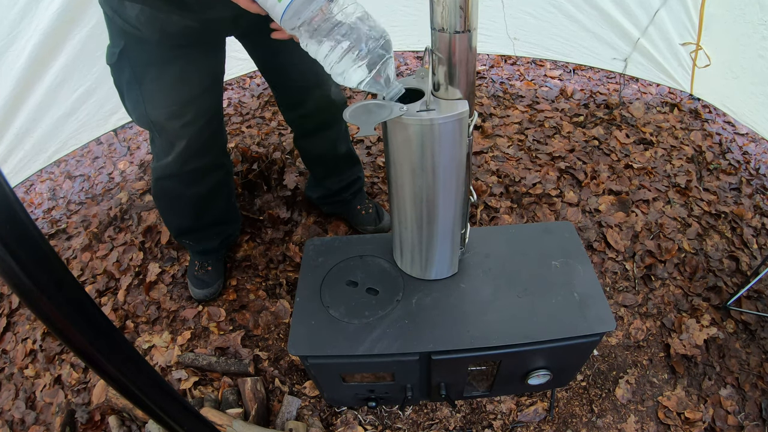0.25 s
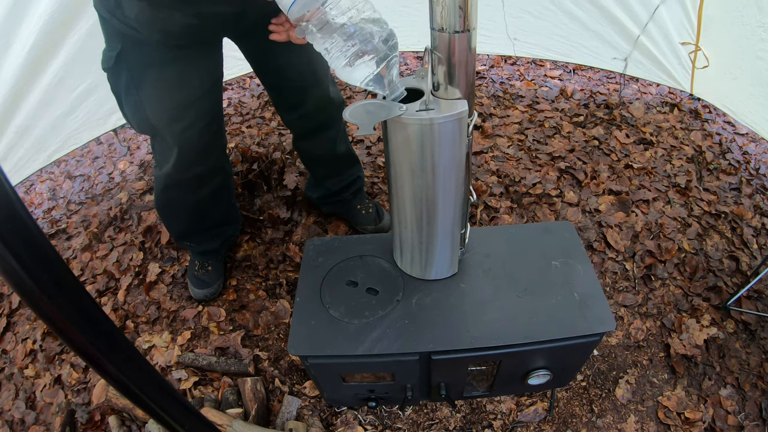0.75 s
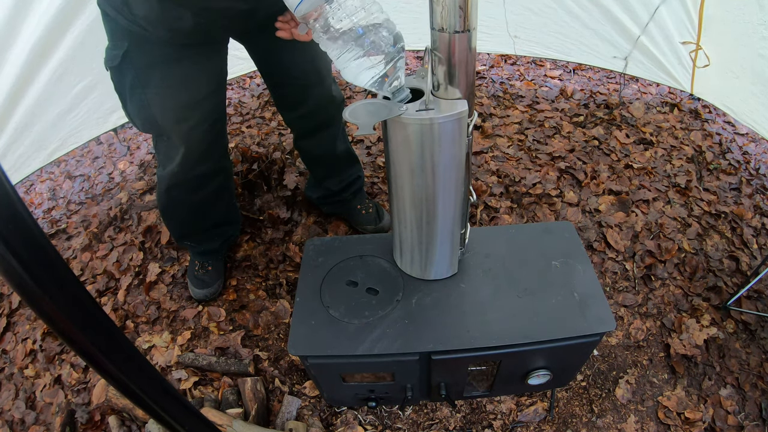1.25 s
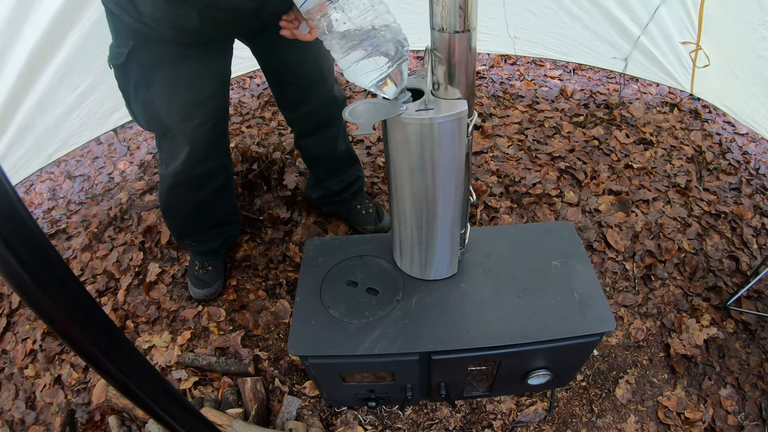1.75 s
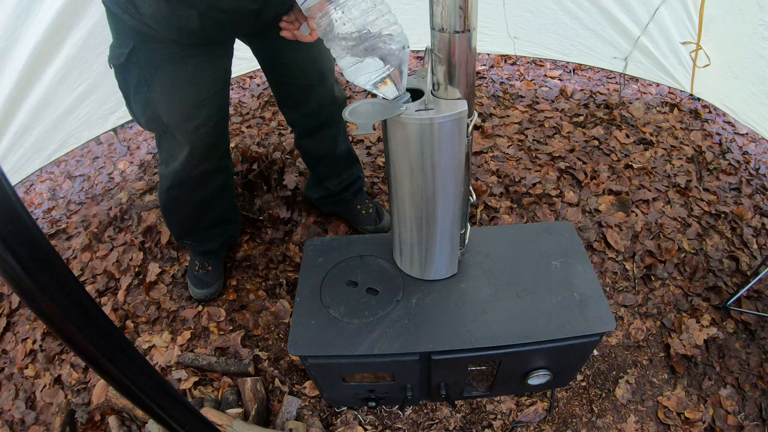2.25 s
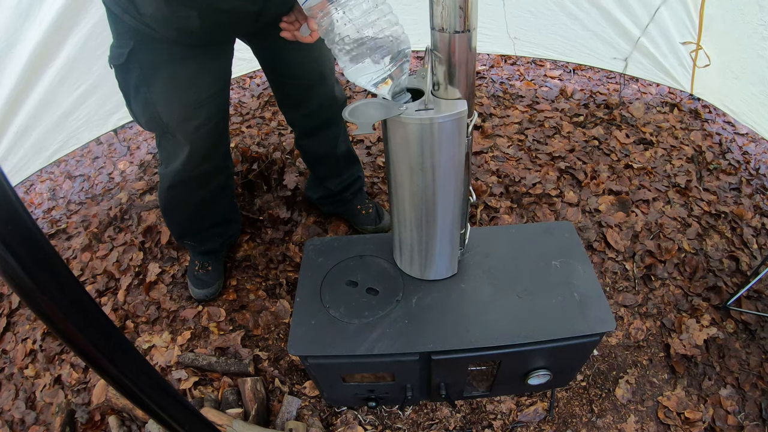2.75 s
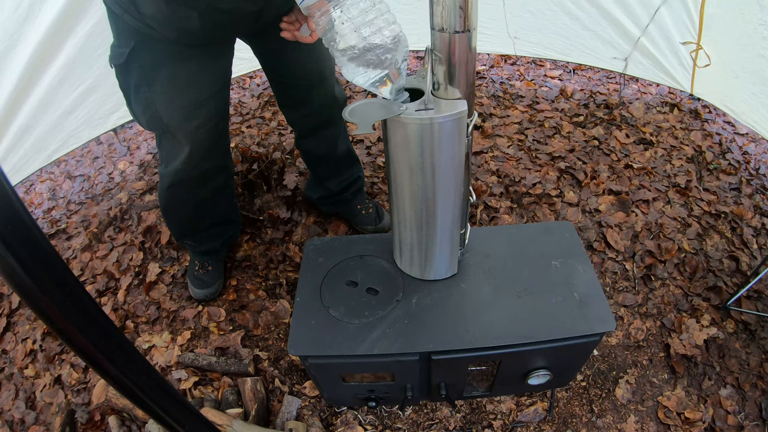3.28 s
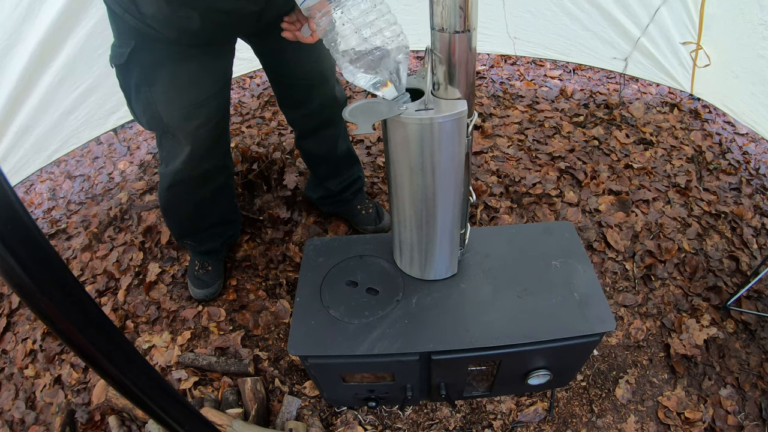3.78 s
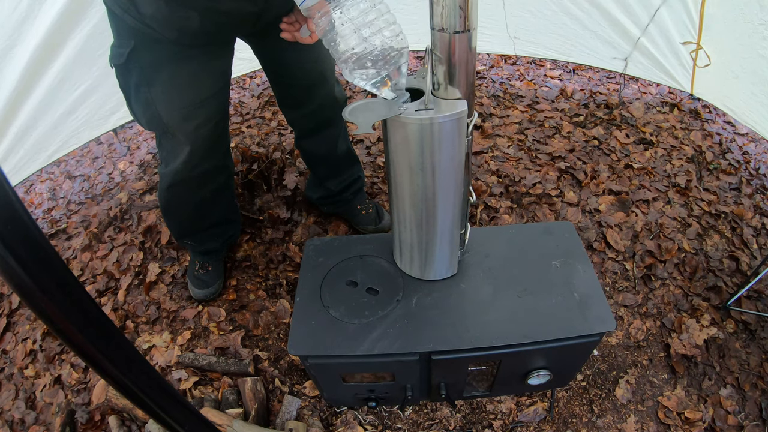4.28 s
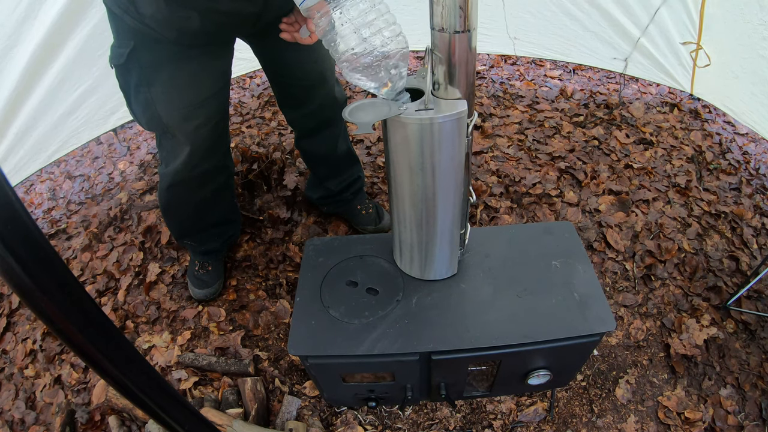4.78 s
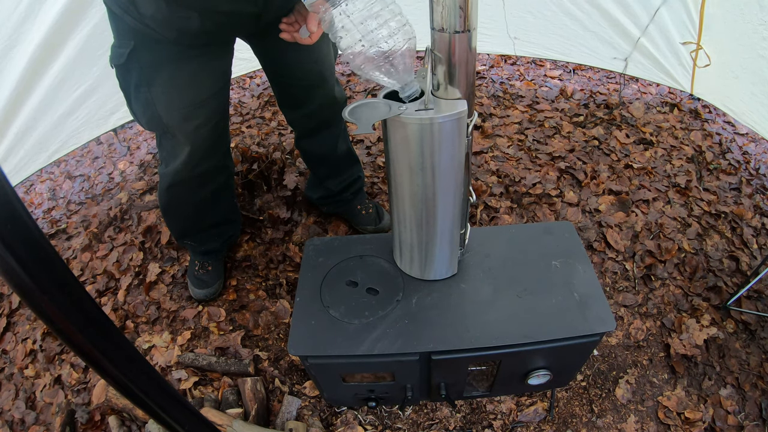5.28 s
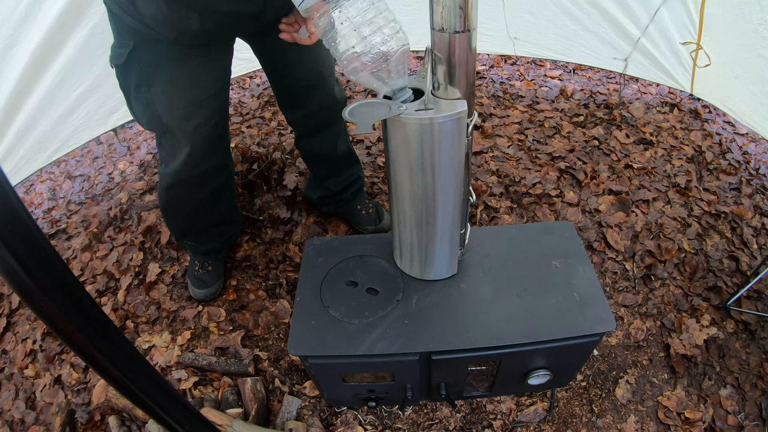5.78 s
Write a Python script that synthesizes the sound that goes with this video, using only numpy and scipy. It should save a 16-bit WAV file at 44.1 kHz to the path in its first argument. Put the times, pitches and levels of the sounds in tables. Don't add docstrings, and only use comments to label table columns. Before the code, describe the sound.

Already under way at the start, a close, wet pour glugs unevenly into a sheet-metal tank. Hollow, low-pitched gulps overlap with bright slaps of water, metallic colour from the tank wall, and clusters of clear bubbles. Soft low thumps come from the flexing bottle. After nearly six seconds the stream quickly dies to a few drips. The tent adds only a very short, soft reflection, near-centred in stereo.

```python
import sys
import numpy as np
from scipy import signal
from scipy.fft import rfft, irfft, next_fast_len
from scipy.io import wavfile
from scipy.ndimage import uniform_filter1d

SR = 44100
rng = np.random.default_rng(int(sys.argv[2]) if len(sys.argv) > 2 else 0)


def volts(x):
    e = np.asarray(x, float) / 20
    return 10 ** e


def inscribe(sig):
    pcm = np.round(np.clip(np.atleast_2d(sig).T, -1, 1) * 32767)
    wavfile.write(sys.argv[1], SR, pcm.astype(np.int16))


N = 266011
T = np.arange(N) / SR

# start in seconds, peak in dB, pitch in Hz, t60 in seconds.
GULPS = [(0.043, -29.5, 267, 0.18), (0.18, -22.5, 299, 0.064), (.362, -25, 318, 0.094),
         (0.526, -22, 287, 0.052), (0.822, -19.5, 295, 0.18), (0.976, -19.5, 292, 0.12),
         (1.169, -12.5, 288.6, .14), (1.299, -28, 279, 0.21), (1.475, -24, 278, 0.078),
         (1.678, -25, 326, 0.051), (1.713, -30.5, 308, 0.08), (1.835, -18.5, 277, 0.068),
         (2.01, -26.5, 282, 0.069), (2.342, -16.5, 304, 0.12), (2.538, -21.5, 290, 0.062),
         (2.883, -31.5, 294, 0.3), (3.348, -18, 313, 0.057), (3.677, -28.5, 306, 0.044),
         (3.79, -24.5, 327, 0.15), (3.964, -23.5, 326.6, 0.2), (3.991, -30.5, 294, 0.17),
         (4.154, -18.5, 306, 0.052), (4.373, -23.5, 332, 0.14), (4.654, -24.5, 301, 0.061),
         (4.826, -23.5, 304, 0.06), (5.005, -22.5, 326, 0.31), (5.106, -33.5, 308, 0.19),
         (5.23, -19.5, 333, 0.07), (5.402, -25, 332, 0.049), (5.548, -21, 340, 0.071)]
# start in seconds, peak in dB, pitch in Hz, low push in dB relative to the glug.
GLUGS = [(0.097, -33, 245, -16), (0.232, -32, 285, -24), (0.426, -29, 248, -21), (0.58, -27.5, 245, -22),
         (0.749, -32.5, 249, -17), (0.918, -33.5, 253, -18), (1.027, -25.5, 258, -40),
         (1.248, -38, 252, -10), (1.429, -31.5, 250, -16.5), (1.519, -31.5, 259, -19),
         (1.776, -28.5, 263, -19), (1.963, -28.5, 256, -51), (2.299, -21.5, 288, -19.5),
         (2.4, -34, 279, -20), (2.651, -26, 236.5, -12), (2.835, -35, 309, -25), (2.938, -25, 290, -15),
         (3.106, -29.5, 267.4, -14), (3.453, -26.5, 304, -11), (3.546, -30, 351, -14),
         (3.755, -28, 289, -13), (3.87, -32.5, 266, -38), (4.128, -32, 294, -13), (4.205, -31, 253, -47),
         (4.436, -26.5, 318, -12), (4.533, -41, 251, -40), (5.631, -43, 254, -32)]
# start in seconds, peak in dB, pitch in Hz, t60 in seconds.
LINKS = [(0.256, -28.5, 240, 0.11), (0.342, -41, 343, 0.037), (.55, -29, 280, 0.046),
         (0.698, -38, 296, 0.12), (1.076, -32.5, 260, 0.062), (1.274, -34.5, 298.5, 0.086),
         (1.566, -34, 240, 0.087), (1.608, -35.5, 283, 0.05), (1.943, -31, 282, 0.16),
         (1.991, -28, 264, 0.064), (2.05, -35, 288, 0.077), (2.083, -33.5, 294, 0.17),
         (2.636, -28.5, 315, 0.049), (2.689, -32.5, 294, 0.055), (2.736, -32.5, 223, 0.032),
         (3.155, -35, 333, 0.036), (3.199, -40, 298, 0.23), (3.26, -39, 301, 0.13),
         (3.883, -32.5, 301, .08), (4.04, -35, 298, 0.11), (4.276, -34, 298, 0.15),
         (4.415, -31, 352, 0.087), (4.468, -31, 267, 0.072), (4.815, -31.5, 335, 0.18)]
# time in seconds, pitch in Hz.
AIR_COLUMN = [
    (0, 292.4),
    (3, 311),
    (6, 320),
]
BOTTLE_HZ = 241.9

# start in seconds, peak in dB, brightness above 5 kHz in relative dB, t60 in seconds.
SLUGS = [(0.191, -27.5, -15, 0.32), (0.31, -38, -5.5, 0.32), (0.466, -32, -39, 0.038),
         (0.812, -20, -11, 0.13), (1.162, -30.5, -12.5, 0.87), (1.296, -40, -9, 0.13),
         (1.362, -30.5, -10, 0.12), (1.827, -23.5, -11.5, 0.13), (2.022, -36, -35, 0.12),
         (2.291, -29, -12.5, 0.39), (2.53, -28.5, -14.5, 0.32), (2.622, -27.5, -16, 0.21),
         (3.197, -29.5, -15, 0.11), (3.674, -33.5, -7, 0.045), (3.771, -26, -14, 0.22),
         (4.148, -25, -6, 0.15), (4.355, -26.5, -16.5, 0.13), (4.648, -41.5, 4.5, 0.16),
         (4.811, -34, -4, 0.34), (5.027, -25.5, -13, 0.13), (5.105, -29, -11, 0.033),
         (5.221, -27, -9.5, 0.32), (5.386, -32.5, -10, 0.24), (5.536, -28, -10, 0.2)]
# start in seconds, peak in dB, brightness above 5 kHz in relative dB.
DRIPS = [(0.005, -31.5, -9), (0.389, -31, -31), (0.52, -24.5, -47), (0.678, -28.5, -23), (0.745, -31, -17),
         (0.9, -47, 1), (1.019, -22.5, -24), (1.063, -30.5, -10), (1.446, -48.5, 8.5), (1.517, -27, -9.5),
         (1.905, -55, -21), (1.937, -24.5, -24), (2.035, -27.5, -25), (2.341, -18, -4.5),
         (2.653, -22.5, -11), (2.703, -30.5, -16), (2.731, -31.5, -14), (2.791, -26.5, 0),
         (3.15, -41, -1.5), (3.301, -57, 11.5), (3.345, -24, -12), (3.46, -36.5, -3.5), (3.49, -30, -9),
         (3.629, -33.5, -19), (3.977, -41.5, -4), (4.054, -36, -8), (4.276, -43.5, 10), (4.998, -27.5, -16),
         (5.455, -25, -19), (5.626, -27.5, -15), (5.721, -53, -31), (5.74, -29, -8), (5.806, -54, 10.5),
         (5.825, -50, -7), (5.857, -59, 11)]
# start in seconds, peak in dB, brightness above 5 kHz in relative dB.
SURGES = [(2.876, -20.5, -9), (3.028, -36.5, -5), (3.246, -45, 1.5), (2.195, -29, -18), (2.458, -46, 5),
          (2.482, -40.5, 3.5), (0.595, -40, -3), (1.642, -30.5, -18), (1.709, -36, -10), (1.978, -38, -4),
          (2.111, -55, 14), (2.225, -25, -7), (3.702, -35, -7.5), (3.868, -44.5, 1), (4.426, -27, -16),
          (4.466, -26.5, -18), (4.53, -26, -16.5), (4.583, -39, -2), (4.721, -42.5, -5), (4.782, -38, -4.5),
          (4.959, -28, -17), (5.057, -40, -5), (5.641, -31, -16)]
# frequency in Hz, level in dB per Hz.
WATER = [(250, -62), (420, -22), (769, -10.5), (965, -6), (1110, -8), (1690, -5.5), (1850, -6), (2250, 0),
         (3490, 8), (5160, -1), (7650, 1.5), (15600, -31.5)]
# frequency in Hz, width in Hz, level in dB when low, level in dB when full.
WALL = [(481, 35, 2.5, 13.5), (974, 33, 8.5, 4), (1210, 220, -24, 3.5), (1450, 39, 10, -0.5),
        (1850, 59, 10.5, -1), (2134, 27, 0, 2.5), (2394, 62, 8, -42), (2820, 140, -1.5, 3.5),
        (3020, 37, -1, -12), (3340, 59, 3, 4)]

# start in seconds, peak in dB, pitch in Hz.
BUBBLES = [(0.082, -41, 765), (0.173, -41, 810), (0.199, -37, 465), (0.341, -44, 677), (0.502, -31, 844),
           (0.853, -29.5, 850), (0.971, -36, 450), (1.163, -35, 760), (1.298, -32, 650), (1.426, -43, 740),
           (1.471, -36, 717), (1.655, -33, 553), (1.829, -46, 806), (2.007, -34, 480), (2.343, -26, 436),
           (2.631, -40, 850), (2.731, -25.5, 487), (2.833, -32, 484), (2.881, -38, 510),
           (2.991, -33.5, 616), (3.176, -36, 510), (3.454, -31, 510), (3.543, -32, 483), (3.565, -36, 767),
           (3.753, -30.5, 460), (4.149, -39, 505), (4.434, -30.5, 427), (4.477, -32.5, 606),
           (4.536, -27, 502), (4.646, -37, 470), (4.823, -42, 510), (5.0, -37, 685), (5.022, -29.5, 660),
           (5.393, -32, 627), (5.545, -32.5, 545), (5.628, -30, 480),
           (0.083, -37, 1380), (0.134, -30, 1510), (0.179, -29.5, 1334), (0.183, -28.5, 910),
          (0.218, -29.5, 894), (0.346, -24, 1586), (0.486, -28.5, 1610), (0.639, -31, 960),
          (0.818, -24, 1400), (0.972, -31.5, 956), (1.019, -28.5, 950), (1.165, -37, 970),
          (1.211, -29.5, 1590), (1.297, -34, 1555), (1.318, -26, 977), (1.429, -34, 903),
          (1.472, -28.5, 970), (1.828, -27.5, 978), (1.941, -37, 1210), (2.308, -28, 1395),
          (2.347, -22, 1377), (2.435, -28.5, 1028), (2.627, -25.5, 1042), (2.66, -38, 996),
          (2.705, -29.5, 995), (2.73, -27.5, 975), (2.838, -26, 1085), (2.885, -30, 1360),
          (3.444, -39, 1410), (3.565, -24.5, 1184), (3.734, -30, 1090), (3.879, -42, 925),
          (4.115, -31, 1130), (4.148, -29, 1520), (4.476, -32, 1360), (4.51, -31, 1210), (4.673, -39, 1500),
          (4.791, -29.5, 1580), (4.814, -30.5, 1160), (4.919, -22.5, 1467), (4.992, -29, 1210),
          (5.1, -37, 1210), (5.113, -24.5, 1330), (5.23, -29.5, 1210), (5.393, -26.5, 1215),
          (5.447, -28.5, 1182),
           (0.007, -29, 2440), (0.027, -31, 2270), (0.6836, -28, 2470), (0.788, -26, 2405),
         (0.807, -22, 2020), (0.974, -22, 1802), (1.0203, -24, 2470), (1.1642, -32, 1860),
         (1.2174, -24, 1784), (1.2968, -28, 2450), (1.518, -34.5, 1850), (1.612, -34, 1960),
         (1.674, -30.5, 1870), (1.7143, -27.5, 1900), (1.8334, -24.5, 1826), (1.9363, -30, 2470),
         (2.084, -25, 1800), (2.3236, -36, 2210), (2.3398, -28, 2060), (2.5182, -33, 2570),
         (2.533, -29, 1880), (2.6523, -39, 1870), (2.7075, -29.5, 1830), (2.8796, -17, 1800),
         (3.1087, -34.5, 1960), (3.1522, -31, 2100), (3.2516, -30.5, 1864), (3.3427, -27, 2424),
         (3.562, -32, 1615), (3.629, -40, 1910), (3.7378, -23, 1814), (3.783, -37, 2430),
         (3.786, -33, 1890), (4.15, -21, 2225), (4.3522, -29, 2320), (4.816, -22.5, 2410),
         (4.92, -36, 1670), (4.978, -26, 2360), (5.0217, -22.5, 1910), (5.1057, -24.5, 2430),
         (5.2275, -29, 2170), (5.3667, -30, 2120), (5.4597, -34, 2170), (5.5738, -24.5, 2050),
         (5.7219, -28, 2130), (5.8257, -34.5, 2090),
           (0.3097, -23, 3210), (0.424, -28, 3290), (0.4653, -29.5, 3300), (0.5247, -28, 3610),
         (0.746, -29.5, 2990), (0.8185, -34, 2980), (1.0196, -37, 3950), (1.1667, -26.5, 3400),
         (1.517, -34, 3040), (1.9051, -27, 3930), (1.937, -32, 3550), (2.0183, -35, 3220),
         (2.3411, -34, 4040), (2.6539, -21, 3144), (2.7911, -26.5, 3560), (2.8873, -17, 3075),
         (3.1517, -32, 3290), (3.3433, -38, 3800), (3.492, -30, 3510), (3.9759, -31, 2730),
         (4.0567, -30.5, 4300), (4.1495, -24, 3410), (4.4263, -25.5, 3470), (4.8174, -31, 2710),
         (5.2265, -33, 2930), (5.6291, -35, 2680)]
# start in seconds, peak in dB, pitch in Hz, t60 in seconds, rise in pitch as a share.
PLINKS = [
    (.205, -38.5, 460, 0.15, 0.029),
    (1.315, -38, 958, 0.2, 0.038),
    (2.42, -37, 749, 0.12, 0.8),
    (2.955, -45, 1450, 0.14, 0.011),
    (2.987, -41, 1840, 0.088, 0.011),
    (2.99, -44, 645, 0.18, 0.088),
    (5.115, -39.5, 970, 0.29, 0.013),
    (5.885, -52, 2160, 0.023, 0.02),
    (5.72, -34.5, 2750, 0.044, 0.0061),
    (5.74, -34.5, 2104, 0.029, 0.0091),
]

# time in seconds, level in dB.
FLOW = [(0, 3.5), (1, 2), (1.95, 1), (2.5, 1.5), (2.9, -0.5), (3.4, 2), (4.1, 1.5), (4.7, 2), (5, 5),
        (5.6, 1), (5.78, -2.5), (5.87, -9), (6.03, -20)]
# level in dB, share of the stream swings, change in dB when full.
FIZZ = (-48, 1, -6)
CHURN = (-44, 1.2, 0.094)
HUM = (-45.5, 1.4, -3.5)

# frequency in Hz, level in dB per Hz.
RUMBLE = [(12, -64), (20, -26.5), (54, -13.5), (102, -22.5), (200, -11.5), (260, -28), (440, -120)]
# start in seconds, peak in dB, pitch in Hz, t60 in seconds.
THUMPS = [(.237, -50, 139, 0.092), (1.057, -46, 140, 0.082), (2.108, -44.5, 54.7, 0.11),
          (2.311, -41, 120, 0.24), (2.655, -44, 110, 0.1), (3.153, -34, 108, 0.041),
          (3.177, -36, 96, 0.037), (3.45, -49, 50, 0.44), (4.426, -46, 55, 0.21), (4.585, -48, 90, .1),
          (4.775, -41, 70, 0.091), (5.155, -50, 115, 0.13), (5.288, -38, 62, 0.12), (5.315, -39, 66, .12),
          (5.346, -46, 120, 0.11)]
# frequency in Hz, level in dB per Hz.
QUIET = [(18, -59), (30, -29), (111, -9), (144, -24), (342, -29), (547, -40), (923, -28), (3080, -28),
         (8000, -37), (15600, -58)]
# frequency in Hz, side over mid in dB.
WIDTH = [(60, -23), (150, -16), (290, -32), (500, -15), (1000, -11), (2400, -17.5), (6000, -8),
         (12000, -4.5)]
# frequency in Hz, left over right in dB.
BALANCE = [(300, -.3), (500, 2.2), (1400, 2.2), (2500, 0), (6000, 0), (12000, 1.5)]


def gulps():
    out, stir = np.zeros(N), np.zeros(N)
    ring_db, push_db = -23, -49
    rows = [(*gulp, ring_db + 16 * gulp[0] / T[-1], push_db) for gulp in GULPS]
    rows += [(at, db, hz, 0.13, -9, glug_push_db) for at, db, hz, glug_push_db in GLUGS]
    rows += [(*link, ring_db, push_db) for link in LINKS]
    wander = 0.049 * rng.standard_normal(len(rows))
    for (at, db, hz, t60, answer_db, low_db), odd in zip(rows, wander):
        column_hz = column_pitch(at)
        other_hz = BOTTLE_HZ if hz > 272 else column_hz
        gulp = ping(hz, max(0.81 * t60, 0.03), 0.0079, -0.02 + odd, bend=0.83)
        add(out, at - 0.004, volts(db) * gulp)
        add(out, at, volts(db - 18.5) * ping(0.5 * (hz + column_hz), 0.07, 0.051, 0))
        add(out, at - 0.002, volts(db + answer_db) * ping(other_hz, 0.087, 0.0091, 0))
        add(out, at - 0.003, volts(db + low_db + 9) * ping(173.3, 0.03, 0.022, 0.17))
        add(stir, at - 0.005, volts(0.79 * db - 60 * T[:8000] / 0.29))
    return out + gurgle(stir) + air_hum()


def gurgle(stir):
    return volts(-31) * stir * swarm(422.5, 1197, 500, 27, 3.44, count=16)


def air_hum():
    noise = rng.standard_normal(N) * flicker(0.02, 2)
    tank, bottle = noise, noise
    for width in (45, 90, 120):
        tank = resonate(tank, column_pitch(T), width)
    for width in (50, 80):
        bottle = resonate(bottle, BOTTLE_HZ, width)
    return volts(-0.5) * flow(*HUM) * (evened(tank) + 0.5 * evened(bottle))


def splashes():
    dull, bright = np.zeros(N), np.zeros(N)
    t = np.arange(9000) / SR
    rows = [(*slug, 0.0049) for slug in SLUGS]
    rows += [(*drip, 0.074, 0.0019) for drip in DRIPS]
    rows += [(*surge, 0.062, 0.0084) for surge in SURGES]
    for at, db, bright_db, t60, rise in rows:
        shape = volts(-60 * t / max(t60, 0.02)) * (1 - np.exp(-t / rise)) ** (1 + 120 * rise)
        shape /= shape.max()
        add(dull, at - 0.001, volts(db - 10) * shape)
        add(bright, at - 0.001, volts(db + bright_db - 4.5) * shape)
    cloud = swarm(592, 5010, 2800, 120, 3.6, count=48) + 0.3 * rng.standard_normal(N)
    spray = swarm(4750, 14840, 4000, 136, 3.3, count=40) + 1.03 * rng.standard_normal(N)
    cloud = evened(colour(in_tank(cloud, 4.1), WATER, 403, 4800))
    cloud = steadied(ragged(cloud, 3.5), 0.73)
    spray = ragged(colour(spray, WATER, 4700), 3.2)
    return flicker(0.004, 1.3) * (volts(-1) * dull * cloud + bright * spray)


def bubbles():
    rows = BUBBLES
    out = np.zeros(N)
    t = np.arange(5000) / SR
    for at, db, hz in rows:
        t60 = np.clip(0.099 * (1000 / hz) ** 0.41, 0.015, 0.13)
        rush = resonate(rng.standard_normal(len(t)), hz, 0.3 * hz)
        rush = evened(resonate(rush, hz, 1.2 * hz))
        shape = volts(-60 * t / t60) * (1 - np.exp(-t / 0.0013))
        add(out, at - 0.001, volts(db - 8) * ping(hz, t60, 0.0011, 0.024, bend=0.91))
        add(out, at - 0.001, volts(db - 10) * shape * rush)
    for at, db, hz, t60, glide in PLINKS:
        add(out, at, volts(db) * ping(hz, t60, 0.0085, glide))
    return out


def stream():
    clumps = flicker(0.03, 2.3)
    fizz = swarm(2204, 15000, 4000, 140, 3.6, count=36) + 0.5 * rng.standard_normal(N)
    churn = swarm(430, 2800, 1100, 105, 3.2, count=30) + 0.3 * rng.standard_normal(N)
    fizz = ragged(colour(in_tank(fizz, 4), WATER, lo_hz=2400), 2.8)
    churn = colour(in_tank(churn, 4.7), WATER, 320, 2130)
    fizz = volts(2.5) * flow(*FIZZ) * evened(clumps * fizz)
    return fizz + volts(-3) * flow(*CHURN) * evened(clumps * churn)


def rumble():
    slosh = flicker(0.04, 3) * colour(rng.standard_normal(N), RUMBLE, hi_hz=220)
    out = volts(-60.1) * evened(slosh) * np.interp(T, [5.75, 5.9], [1, 0.4])
    for at, db, hz, t60 in THUMPS:
        add(out, at - 0.069 * t60, volts(db) * ping(hz, t60, 0.06 * t60, 0.096))
    return out


def quiet_air():
    return volts(-67.5) * evened(colour(rng.standard_normal(N), QUIET))


def tent(x):
    t = np.arange(6000) / SR
    t60 = np.array([[0.16], [0.06], [0.06]])
    echoes = rng.choice([-1., 1.], (3, 6000)) * (rng.random((3, 6000)) < 0.05)
    tails = echoes * volts(-60 * t / t60)
    wet, one, two = (signal.oaconvolve(x, tail / np.linalg.norm(tail))[:N] for tail in tails)
    turn = 2 * np.pi * 3.3 * T
    mid = x + volts(-16) * wet
    side = volts(3.5) * colour(np.cos(turn) * one + np.sin(turn) * two, WIDTH)
    left = [(hz, db / 2) for hz, db in BALANCE]
    right = [(hz, -db / 2) for hz, db in BALANCE]
    right = [(hz, 1 * db) for hz, db in right]
    return np.array([colour(mid + side, left), colour(mid - side, right)])


def column_pitch(s):
    return np.interp(s, *np.transpose(AIR_COLUMN))


def flow(level_db, share, full_db):
    starts = np.array([gulp[0] for gulp in GULPS] + [2 * T[-1]])
    until_gulp = starts[np.searchsorted(starts, T)] - T
    choke_db = -5.5 * np.exp(-until_gulp / 0.23)
    stream_db = np.interp(T, *np.transpose(FLOW))
    return volts(level_db + share * stream_db + full_db * T / T[-1] + choke_db)


def in_tank(x, ring_db):
    full = T / T[-1]
    rings = np.zeros(N)
    for k, (hz, width, low_db, full_db) in enumerate(WALL):
        gain = volts(low_db + (full_db - low_db) * full)
        rings += (-1) ** k * gain * resonate(x, hz, width)
    return x + volts(ring_db) * rings


def ping(hz, t60, rise, glide, bend=1):
    t = np.arange(round(min(t60, 0.4) * SR)) / SR
    shape = volts(-60 * (t / t60) ** bend) * (1 - np.exp(-(t / rise) ** 2))
    return shape / shape.max() * np.sin(2 * np.pi * hz * (t + glide * t ** 2 / t60))


def swarm(lo_hz, hi_hz, per_s, cycles, spread_db, count):
    size, kind = rng.exponential(1, N), rng.integers(0, count, N)
    traits = rng.random((count, 2))
    train = (rng.random(N) < per_s / SR) * volts(spread_db * np.minimum(size, 3))
    out = np.zeros(N)
    for k, (hz, (life, glide)) in enumerate(zip(np.geomspace(lo_hz, hi_hz, count), traits)):
        grain = ping(hz, cycles * (0.5 + life) / hz, 2.5 / hz, 0.05 * glide ** 2)
        out += signal.oaconvolve(train * (kind == k), grain)[:N] * np.sqrt(hz)
    return evened(out)


def resonate(x, hz, width):
    turn = np.exp(2j * np.pi * np.cumsum(hz * np.ones(len(x))) / SR)
    r = np.exp(-np.pi * width / SR)
    return 2 * (turn * signal.lfilter([1 - r], [1, -r], x / turn)).real


def ragged(x, depth_db):
    z = signal.stft(x, nperseg=256)[2]
    patches = uniform_filter1d(rng.standard_normal(z.shape), size=9, axis=0)
    patches = evened(uniform_filter1d(patches, size=6, axis=1))
    patches = patches - patches[:60].mean(0)
    return evened(signal.istft(z * volts(depth_db * patches), nperseg=256)[1][:N])


def steadied(x, share):
    power = abs(uniform_filter1d(x ** 2, size=500))
    return evened(x / (power + 1e-3) ** (share / 2))


def flicker(seconds, depth_db):
    size = max(round(seconds * SR), 1)
    wobble = uniform_filter1d(uniform_filter1d(rng.standard_normal(N), size), size)
    return volts(depth_db * evened(wobble))


def colour(x, points, lo_hz=0, hi_hz=SR):
    size = next_fast_len(x.shape[-1])
    hz = np.fft.rfftfreq(size, 1 / SR) + 1
    f, db = np.transpose(points)
    gain = volts(np.interp(np.log(hz + 1), np.log(f + 1), db))
    band = 1 / np.sqrt((1 + (lo_hz / hz) ** 8) * (1 + (hz / hi_hz) ** 8))
    return irfft(rfft(x, size) * gain * band, size)[..., :x.shape[-1]]


def evened(x):
    return x / np.sqrt(np.mean(x ** 2) + 1e-20)


def add(mix, s, sound):
    part = mix[max(round(s * SR), 0):][:len(sound)]
    part += sound[:len(part)]


def scene():
    return tent(gulps() + splashes() + bubbles() + stream() + rumble() + quiet_air())


def roll_off(x):
    return signal.sosfilt(signal.butter(12, 15720, fs=SR, output="sos"), x)


def record(dry):
    edge = signal.firwin(801, 15650, window=("kaiser", 9), fs=SR)[None]
    return roll_off(signal.oaconvolve(dry, edge, "same"))


dry = scene()
out = record(dry)
inscribe(out)
```